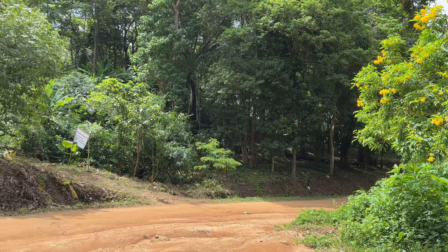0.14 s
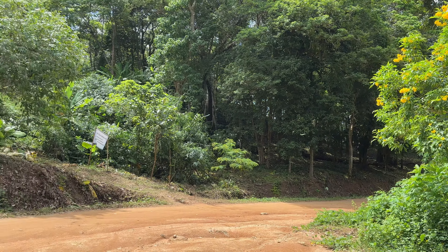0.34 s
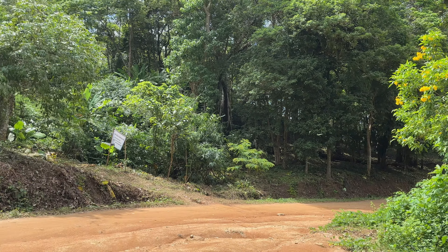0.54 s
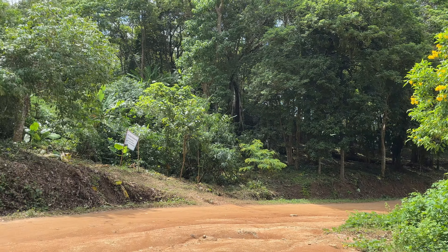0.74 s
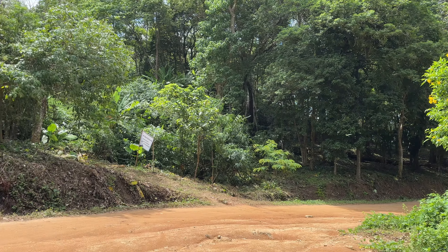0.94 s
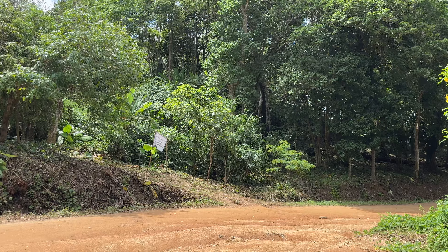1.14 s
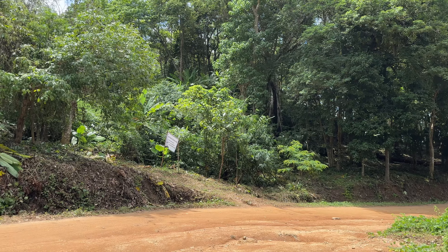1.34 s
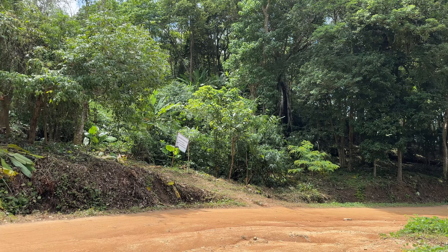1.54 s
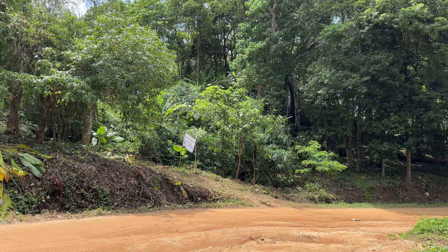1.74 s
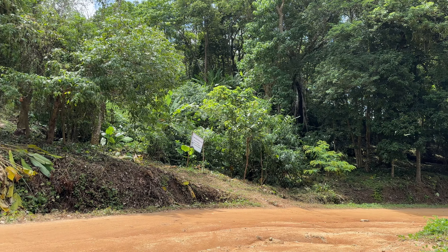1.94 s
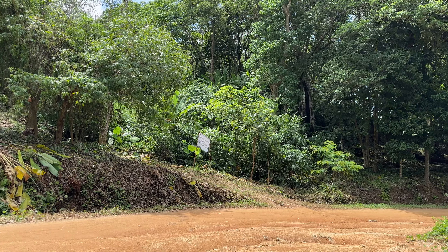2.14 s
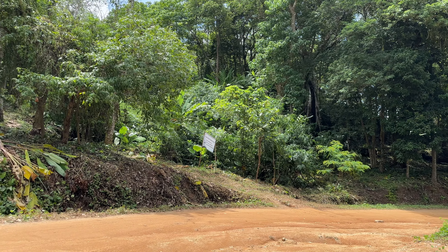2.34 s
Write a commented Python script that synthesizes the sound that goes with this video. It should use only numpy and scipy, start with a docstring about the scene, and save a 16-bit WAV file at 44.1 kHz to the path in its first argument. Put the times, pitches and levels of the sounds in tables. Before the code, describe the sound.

A car door shuts close by with a boomy thud, amid thin bird whistles and insect drone

```python
"""Something like a car door shuts close by: the latch cracks, the body booms and the trees return the blow.
Later a shoe scuffs grit; small ticks and soft bumps are scattered about, and birds whistle thin glides.
Insects drone over the hush and far rumble of a dirt road at a jungle's edge.
Struck bodies are decaying sines, whistles are gliding sines, and all the rest is coloured, shaped noise."""
import sys
import numpy as np
from scipy import signal
from scipy.fft import rfft, irfft
from scipy.io import wavfile
from scipy.ndimage import uniform_filter1d

SR = 44100
rng = np.random.default_rng(int(sys.argv[2]) if len(sys.argv) > 2 else 0)


def waveform_to_disk(signal):
    """Save audio, clipped to [-1, 1], as 16-bit WAV at the path in sys.argv[1]."""
    frames = np.transpose(np.atleast_2d(signal))
    scaled = np.clip(frames, -1, 1) * 32767
    samples = np.round(scaled).astype(np.int16)
    wavfile.write(sys.argv[1], SR, samples)


N = 105840
T = np.arange(N) / SR
HZ = np.maximum(np.arange(N // 2 + 1) * SR / N, 1)
SIDES = np.array([[1], [-1]])  # left, right

# likeness of distant sound at the two microphones, limited to -1..1 in use: (frequency [Hz], likeness)
DISTANT_LIKENESS = [(60, 0.99), (140, 0.84), (300, 0.74), (640, 0.073), (1400, -.15), (3100, 0.35),
                    (7000, -0.42), (15000, -3)]
# near sounds reach the microphones unequally: (frequency [Hz], left minus right [dB])
NEAR_BALANCE = [(300, -1.5), (750, 4), (1400, -7), (2600, -3.5), (3700, -4.5), (5500, 12), (7500, 23.5),
                (10000, -10)]
# near sounds reach the microphones out of step: (frequency [Hz], phase lead of the left [rad])
NEAR_LEAD = [(200, 0.5), (520, 2.16), (1000, 3), (2300, 2), (3300, 6), (4400, 3.5), (6900, 7)]


def amp(db):
    """Decibels to gain."""
    return 10 ** (np.asarray(db) / 20)


def colour(points):
    """A table interpolated over log frequency, read at every bin."""
    hz, value = np.transpose(points)
    return np.interp(np.log(HZ), np.log(hz), value)


def pan(db):
    """Left and right gains of constant power for a left-minus-right difference in dB."""
    gains = amp(np.atleast_1d(db) * SIDES / 2)
    return gains / np.sqrt(np.mean(gains ** 2, axis=0))


def noise(gain, likeness, pan_db=0, lead=0):
    """Stereo noise with a gain per root Hz, a left-right likeness and a phase lead of the left."""
    mid, side = rfft(rng.standard_normal((2, N)))
    likeness = np.clip(likeness, -1, 1)
    pair = np.sqrt(1 + likeness) * mid + np.sqrt(1 - likeness) * side * SIDES
    spectrum = pair * gain * pan(pan_db) * np.exp(.5j * lead * SIDES)
    return irfft(spectrum, N) * np.sqrt(SR) / 2


def near_noise(gain, pan_db):
    """Noise from close by: balance, phase lead and likeness of the two sides vary with frequency."""
    # (frequency [Hz], likeness)
    near_likeness = [(150, 1), (700, 0.82), (1500, 1), (3000, 0.46), (7000, 1)]
    return noise(gain, colour(near_likeness), colour(NEAR_BALANCE) + pan_db, colour(NEAR_LEAD))


def near_sound(x, lead_share):
    """A broad surface close by: one signal given the near balance and a share of the near phase lead."""
    turn = np.exp(.5j * lead_share * colour(NEAR_LEAD) * SIDES)
    return irfft(rfft(x) * pan(colour(NEAR_BALANCE)) * turn, N)


def resonance(hz, width):
    """The gain curve of a single peak, scaled to unit power."""
    gain = 1 / (1 + ((HZ - hz) / width) ** 2 * 2)
    return gain / np.sqrt(np.sum(gain ** 2) * SR / N)


def drift(rate):
    """Random wandering of spread 1, rolled off above a rate in Hz."""
    x = irfft(rfft(rng.standard_normal(N)) / (1 + (HZ / rate) ** 2), N)
    return x / x.std()


def swell(s, rise, t60):
    """Grows exponentially to a peak at s, then dies away."""
    return np.exp(np.minimum(T - s, 0) / rise) * amp(-60 * np.maximum(T - s, 0) / t60)


def burst(s, attack, t60):
    """Silent until s, then a straight attack and an exponential decay."""
    return np.clip((T - s) / attack, 0, 1) * amp(-60 * np.maximum(T - s - attack, 0) / t60)


def ring(modes, s):
    """Modes struck at s: each is a sine that decays exponentially."""
    age = np.maximum(T - s, 0)
    return sum(amp(db - 60 * age / t60) * np.sin(2 * np.pi * hz * age) for hz, db, t60 in modes)


def door():
    """A soft noise swells, each contact booms, knocks the panel and rattles the latch; then the blow returns."""
    # the door meets seal, latch and frame, then rebounds; levels are gains on the tables below:
    # (time [s], boom gain [dB], panel gain [dB], crack gain [dB], crack t60 [s])
    contacts = [(0.226, -64, -23, -13.5, 0.13), (0.2366, -50, 2.5, 0.5, 0.089),
                (0.2421, -1, 2, -0.5, 0.087), (.263, -49.5, -10.5, -5, .08), (.277, -10.5, -20, -29, 0.021)]
    # modes of cabin and body before the contact gain: (frequency [Hz], level [dB], t60 [s])
    boom_modes = [(54.6, -20.5, 0.62), (77.4, -16, .31), (101, -31.5, 0.054), (120.7, -21.5, 0.11),
                  (166, -27, 0.2), (201.4, -39.5, 0.27)]
    # modes of the heavily damped panel before the contact gain: (frequency [Hz], level [dB], t60 [s])
    panel_modes = [(350, -44, 0.11), (497, -32.5, 0.046), (673, -40, 0.081), (877, -27.5, 0.062),
                   (1135, -33.5, 0.046), (1246, -35, .04), (1382, -31.5, 0.044), (2730, -42, 0.045)]
    # latch crack and rattle before the contact gain: (frequency [Hz], density [dB per Hz])
    crack_colour = [(150, -74), (500, -71), (1400, -66.5), (1800, -80), (2800, -81), (3500, -83.5),
                    (5400, -77.5), (7500, -84.5), (9500, -102), (11000, -130)]

    boom = -sum(amp(db) * ring(boom_modes, s) for s, db, _, _, _ in contacts)
    boom = signal.sosfilt(signal.butter(2, 47.7, "high", fs=SR, output="sos"), boom)

    # neighbouring modes start with opposite sign
    panel = sum(amp(db) * (ring(panel_modes[::2], s) - ring(panel_modes[1::2], s))
                for s, _, db, _, _ in contacts)

    rattle = sum(amp(db) * burst(s, 0.0019, t60) for s, _, _, db, t60 in contacts)
    rattle = rattle * amp(1.6 * drift(350))
    crack = rattle * near_noise(amp(colour(crack_colour)), pan_db=3)
    return soft_swell() + boom + near_sound(panel, lead_share=0.88) + crack + returned_blow()


def soft_swell():
    """A faint soft noise around the first contacts: near noise swelling up to them, then dying quickly."""
    # at the peak of the swell: (frequency [Hz], density [dB per Hz])
    swell_colour = [(50, -81), (130, -73), (300, -79), (1300, -80.5), (2000, -93), (6000, -115)]
    return swell(.235, rise=.012, t60=.03) * near_noise(amp(colour(swell_colour)), pan_db=-1.5)


def returned_blow():
    """Ground and trees scatter the blow: an early noise tail, then a duller one that rises more slowly."""
    # early tail at its peak: (frequency [Hz], density [dB per Hz])
    early_colour = [(50, -63.5), (110, -52.5), (250, -65.5), (500, -69), (800, -79), (1300, -80.5),
                    (2000, -89.5), (4000, -92.5), (7000, -92.5), (11000, -126)]
    # late tail at its peak: (frequency [Hz], density [dB per Hz])
    late_colour = [(50, -68), (120, -74.5), (250, -85.5), (500, -84.5), (1300, -95), (2000, -102),
                   (4500, -105), (7000, -110), (11000, -135)]
    likeness = colour(DISTANT_LIKENESS)
    early = burst(.245, attack=0.0137, t60=0.53) * noise(amp(colour(early_colour)), likeness, pan_db=0.9)
    late = burst(0.39, attack=0.072, t60=0.88) * noise(amp(colour(late_colour)), likeness, pan_db=0.3)
    return early + late


def shoe():
    """The sole drags over grit and catches a few times: strokes shape noise whose level flickers grainily."""
    # strokes, as gains on the grit: (time of the peak [s], gain [dB], rise [s], decay t60 [s])
    scuffs = [(2.071, 0.5, 0.065, 0.47), (2.054, 3.5, 0.0037, 0.078), (2.094, 1.5, 0.0045, 0.12),
              (2.031, 3, 0.00082, 0.015), (2.225, -14, 0.059, 0.76)]
    # grit before stroke and grain: (frequency [Hz], density [dB per Hz])
    grit_colour = [(100, -88.5), (300, -103), (700, -102.5), (1300, -96.5), (2200, -99), (3300, -97.5),
                   (5000, -100), (7500, -101), (9500, -114), (11500, -135)]
    grain_db, grain_rate_hz = 3, 270
    force = np.sqrt(sum((amp(db) * swell(s, rise, t60)) ** 2 for s, db, rise, t60 in scuffs))
    grain = amp(grain_db * drift(grain_rate_hz))
    return force * grain * near_noise(amp(colour(grit_colour)), pan_db=6.5)


def taps(rows, width, attack, pan_db):
    """Small blows: each is a noise burst in one broad resonance, its width a share of the pitch."""
    return sum(amp(db) * burst(s, attack, t60) * noise(resonance(hz, width * hz), 0.18, pan_db)
               for s, hz, db, t60 in rows)


def ticks():
    """Small dry ticks, as of twigs: very short bursts with a sharp attack."""
    # (time [s], pitch [Hz], level [dB], t60 [s])
    tick_rows = [(.136, 2800, -67, 0.019), (.181, 2800, -63.5, 0.0082), (.811, 2900, -61, 0.0084),
                 (1.9, 3200, -73.5, .02), (2.24, 1942, -67.5, .025)]
    return taps(tick_rows, width=0.53, attack=0.00054, pan_db=4)


def bumps():
    """Soft distant bumps: narrower resonances with a gentler attack."""
    # (time [s], pitch [Hz], level [dB], t60 [s])
    bump_rows = [(.99, 1400, -81, 0.13), (1.578, 1460, -78, 0.29), (1.64, 1436, -73.5, 0.13),
                 (1.812, 310, -61, 0.055), (1.838, 375.1, -62, 0.099), (1.996, 743, -65, 0.12)]
    return taps(bump_rows, width=.25, attack=0.004, pan_db=0.0)


def birds():
    """Near-pure glides that waver a little in pitch and level and linger among the trees."""
    # one list of glide points for each whistle, before the waver: (time [s], pitch [Hz], level [dB])
    whistles = [
        [(.335, 3650, -79), (.38, 4250, -63), (.42, 4690, -65.5), (.45, 4850, -59), (.488, 5820, -65),
         (.508, 5370, -64)],
        [(.75, 4620, -84), (.87, 4540, -82), (.97, 4630, -81)],
        [(1.345, 6080, -74.5), (1.41, 5650, -74), (1.445, 5800, -79.5), (1.485, 6450, -65.5), (1.52, 6950, -78)],
        [(1.385, 2882, -87), (1.435, 2635, -75), (1.5, 2687, -79.5), (1.54, 2650, -85), (1.58, 3026, -73),
         (1.61, 3080, -80)],
        [(1.78, 4390, -89), (1.89, 4570, -88), (1.96, 4620, -76)],
    ]
    # one value for each whistle: left minus right [dB]
    whistle_pans = [6, 7, 11, 1.5, -8]
    waver, waver_db = .011, 3.5  # spreads of pitch (as a share) and of level
    dry_song = 0
    for rows, pan_db in zip(whistles, whistle_pans):
        s, hz, db = np.transpose(rows)
        pitch = uniform_filter1d(np.interp(T, s, hz), size=600) * (1 + waver * drift(89))
        gate = uniform_filter1d(1. * ((T > s[0]) & (T < s[-1])), size=400)
        level = amp(np.interp(T, s, db) + waver_db * drift(85))
        tone = np.sin(2 * np.pi * np.cumsum(pitch) / SR)
        dry_song = dry_song + pan(pan_db) * gate * level * tone

    # the trees answer as decaying noise of unit energy on each side
    trees = rng.standard_normal((2, N)) * burst(0.0072, attack=.01, t60=.45)
    trees /= np.sqrt(np.sum(trees ** 2, axis=1, keepdims=True))
    return dry_song + amp(-5) * signal.fftconvolve(dry_song, trees, axes=1)[:, :N]


def insects():
    """Each chorus is a narrow band of buzz, driven in rapid strokes that start sharply and fade."""
    # choruses; level is before skirt, pulse and flutter, pulse rate before its wander, flutter a spread:
    # (centre [Hz], width [Hz], level [dB], left minus right [dB], likeness,
    #  pulse rate [per s], pulse depth, flutter [dB])
    choruses = [(8013, 810, -68.5, 16, .1, 270, .3, 0.64), (8446, 810, -71, -1, 0.077, 111, 0.2, -0.1),
                (9575, 430, -80.5, -4.5, 0.33, 70, 0.12, 1.5), (15400, 650, -76.5, 0.5, .9, 30, .35, 0),
                (14140, 1500, -85.5, 1, 0.4, 26, 0.14, -1.6), (4670, 330, -87.5, 9, 0.074, 36, 0.18, 0.5),
                (6200, 1400, -96.5, 32, 0.14, 50, 0.11, 1.5)]
    rate_wander = .015  # spread, as a share of the rate
    out = 0
    for hz, width, db, pan_db, likeness, rate, depth, flutter_db in choruses:
        cycle = np.cumsum(rate * (1 + rate_wander * drift(4.5))) / SR % 1
        pulse = uniform_filter1d(1 + depth * (1 - 2 * cycle), size=50)
        skirt = 1 / (1 + ((HZ - hz) / (2 * width)) ** 4)
        buzz = noise(resonance(hz, width) * skirt, likeness, pan_db)
        out = out + buzz * pulse * amp(db + flutter_db * drift(40))
    return out


def air():
    """A steady forest hush over a far rumble that swells slowly: one noise colour split into two bands."""
    # hush and rumble together, before the swell: (frequency [Hz], density [dB per Hz])
    air_colour = [(20, -100), (40, -92), (60, -78.5), (110, -84), (200, -97.5), (400, -106), (800, -113),
                  (2000, -116), (4000, -118), (6000, -114), (9500, -118), (11500, -134)]
    # swell of the rumble, before a small random drift: (time [s], gain [dB])
    rumble_swell = [(0, 0), (.9, 3.5), (1.25, -1), (1.6, 1.5), (1.9, 1.5), (2.15, 5.5), (2.4, -2)]
    rumble_top_hz = 440
    gain = amp(colour(air_colour))
    low = 1 / (1 + (HZ / rumble_top_hz) ** 4)  # the rumble's share of the power
    likeness = colour(DISTANT_LIKENESS)
    level = amp(np.interp(T, *np.transpose(rumble_swell)) + 1.4 * drift(8))
    rumble = noise(gain * np.sqrt(low), likeness, pan_db=-.7) * level
    hush = noise(gain * np.sqrt(1 - low), likeness, pan_db=0.9)
    return rumble + hush


def scene():
    """The door, shoe and small sounds over birds, insects and the air of the road."""
    return door() + shoe() + ticks() + bumps() + birds() + insects() + air()


def record(dry):
    """The treble is cut steeply above 15750 Hz by an elliptic low-pass."""
    return signal.sosfilt(signal.ellip(12, .1, 80, 15750, fs=SR, output="sos"), dry)


dry = scene()
out = record(dry)
waveform_to_disk(out)
```